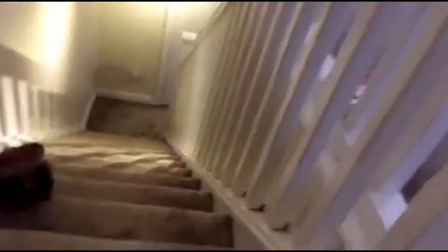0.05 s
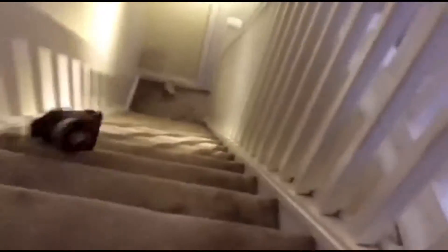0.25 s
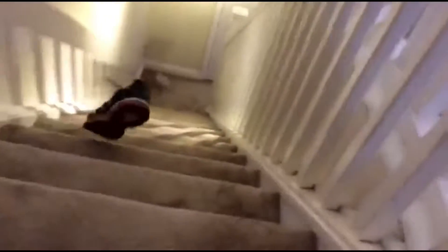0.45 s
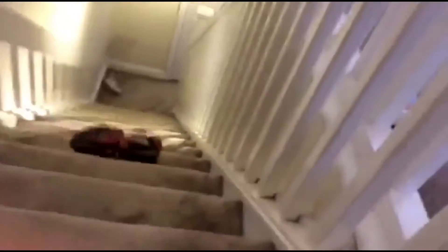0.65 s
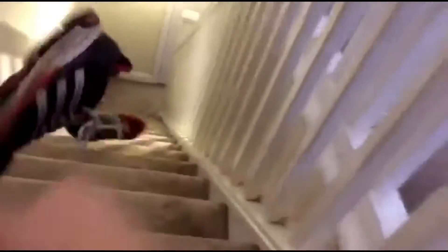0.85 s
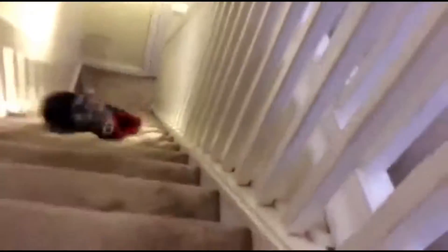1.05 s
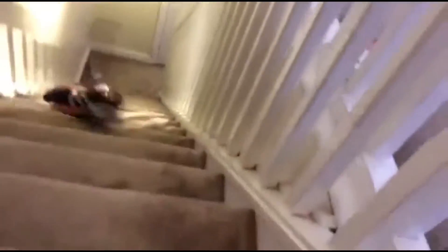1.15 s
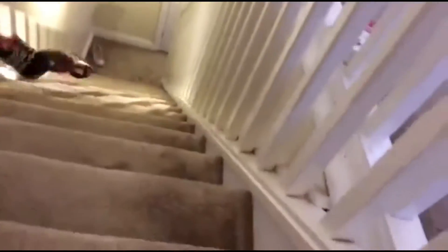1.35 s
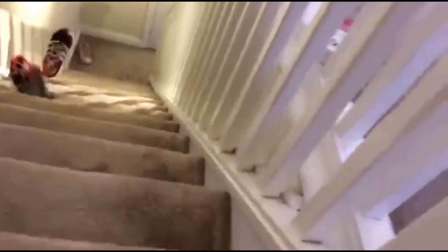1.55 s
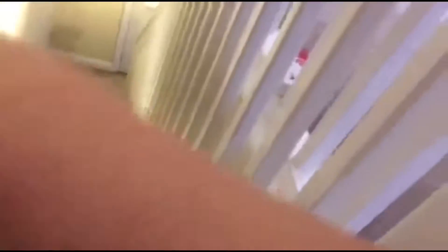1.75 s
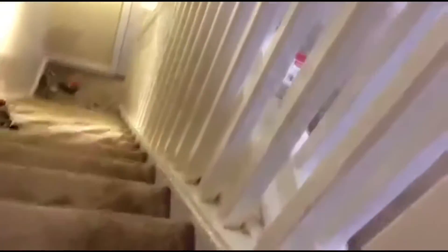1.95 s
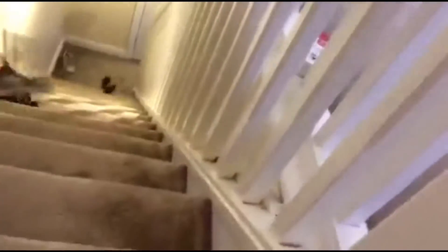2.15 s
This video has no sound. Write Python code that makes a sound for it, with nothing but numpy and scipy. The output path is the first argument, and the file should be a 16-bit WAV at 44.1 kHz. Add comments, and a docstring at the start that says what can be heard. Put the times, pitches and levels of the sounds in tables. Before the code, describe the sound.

Thrown shoes thud and bounce down a carpeted wooden staircase in two heavy tumbles.

```python
"""Shoes tumble down a carpeted wooden staircase. Over low room noise and a soft hiss, lace tips
tick, then a flurry of landings at 0.2 s rings the treads and the hollow flight under them, with
uppers scuffing the carpet, soles slapping and heels knocking. Lighter bounces and two rubber
squeaks follow; a second heavy tumble from 1.2 s brings a third squeak, and the last thuds fall
near 2 s. The stairwell gives every hit a short, boomy echo."""
import sys
import numpy as np
from scipy import signal
from scipy.fft import rfft, irfft
from scipy.io import wavfile
from scipy.ndimage import uniform_filter1d

SR = 44100
rng = np.random.default_rng(int(sys.argv[2]) if len(sys.argv) > 2 else 0)


def wrap_up_sound(samples):
    """Save the sound to the file named by the first command line argument, as 16-bit audio."""
    columns = np.atleast_2d(samples).T
    # keep every value between -1 and 1, then stretch to whole-number steps
    tamed = np.clip(columns, -1, 1)
    steps = np.round(tamed * 32767).astype(np.int16)
    wavfile.write(sys.argv[1], SR, steps)


N = 97020  # 2.2 s


def undb(db):
    """Decibels to gain."""
    return 10 ** (np.asarray(db) / 20)


def unit(x):
    """Scale to rms 1."""
    return x / np.sqrt(np.mean(x ** 2))


def fade(t, t60):
    """Exponential decay, 60 dB down after t60 seconds."""
    return np.exp(-np.log(1000) * t / max(t60, 1e-3))


def add(out, start_s, x):
    """Mix x in from start_s."""
    i = max(int(start_s * SR), 0)
    out[i:i + len(x)] += x[:len(out) - i]


def colour(x, points, tilt_db=0):
    """EQ x through (Hz, dB) points, tilted per octave and rolled off below the first; rms 1."""
    hz = np.fft.rfftfreq(len(x), 1 / SR) + 1
    point_hz, point_db = np.array(points).T
    db = np.interp(np.log2(hz), np.log2(point_hz), point_db)
    db += tilt_db * np.log2(np.maximum(hz, point_hz[0]))
    low_cut = np.minimum(hz / point_hz[0], 1) ** 2
    return unit(irfft(rfft(x) * undb(db) * low_cut, len(x)))


def resonate(x, hz, width_hz):
    """One band-pass resonance."""
    return signal.lfilter(*signal.iirpeak(hz, hz / width_hz, fs=SR), x)


def ring(t, hz, t60, push_s):
    """A mode that swells while the shoe presses on it, then dies away."""
    attack = np.sin(np.pi / 2 * np.minimum(t / push_s, 1)) ** 2
    return np.sin(2 * np.pi * hz * t) * fade(t, t60) * attack


# EQ curves of the low room noise and the hiss (frequency [Hz], relative level [dB])
ROOM_TONE_EQ = [(18, -28), (30, -3), (87, 3), (139, -6), (345, -8), (550, -46), (618, -30), (798, -25.5),
                (1300, -44.5), (1840, -49.5), (2550, -54), (3540, -35), (7800, -54), (10100, -98),
                (17200, -120)]
HISS_EQ = [(400, 5.5), (1000, -3), (1500, -1), (1690, 6), (1870, 7.5), (2030, -1.5), (2800, -8),
           (3400, -3.5), (4000, -10), (7800, -15.5)]
# Fader rides of the same two layers (time [s], level [dB])
ROOM_TONE_RIDE = [(0, -48), (.15, -47), (.7, -47.5), (1.06, -78), (1.878, -46.5), (2.2, -75)]
HISS_RIDE = [(0, -49), (.075, -49.5), (.105, -45.5), (.15, -51.5), (.4, -54.5), (.75, -51), (1.06, -59),
             (1.18, -53), (1.7, -53), (1.87, -61.5), (2.2, -55)]


def room_tone():
    """A bed of low room noise and soft hiss, each swelling and dipping."""
    out, t = np.zeros(N), np.arange(N) / SR
    for eq, ride in ((ROOM_TONE_EQ, ROOM_TONE_RIDE), (HISS_EQ, HISS_RIDE)):
        level_db = np.interp(t, *np.array(ride).T)
        out += undb(level_db) * colour(rng.standard_normal(N), eq)
    return out


# Lace and eyelet hits (time [s], click level [dB], rattle level [dB], rattle t60 [s],
# ring pitch [Hz], relative ring level [dB])
LACE_HITS = [(0.1624, -46.5, -31.5, .14, 6170, -27), (0.169, -27, -37, 0.069, 6130, -1),
             (0.177, -38, -32, .14, 2220, 9), (0.2006, -26, -26, 0.11, 3270, -1),
             (0.2027, -27.5, -28, .06, 2960, -7), (0.225, -14, -41, .06, 3180, 6),
             (0.245, -30, -45, .08, 3240, 4.5), (0.27, -31.5, -38, .09, 3130, 15),
             (0.6126, -33, -48.5, 0.07, 5600, 2.5), (0.627, -41.5, -51, .06, 3120, -5.5),
             (0.853, -27.5, -42.5, 0.053, 4200, -23), (0.862, -29.5, -52.5, 0.052, 2900, -9),
             (0.910, -50.5, -36.5, .15, 4440, -14), (0.991, -51, -47, 0.14, 3730, -19),
             (1.2505, -27, -37.5, 0.14, 4700, -5), (1.264, -45.5, -32.5, 0.1, 5530, -6.5),
             (1.3677, -42.5, -56, 0.083, 4580, -4), (1.4326, -30.5, -43, 0.22, 7000, -34),
             (1.4837, -26.5, -45.5, 0.083, 3670, 15), (1.754, -45, -38, 0.18, 4470, -1),
             (1.766, -43, -38.5, 0.17, 3360, 17)]
# Bright EQ of a tick (frequency [Hz], relative level [dB])
TICK_EQ = [(500, -21), (1200, -4.5), (2300, 1), (3500, 3), (5000, -4.5), (6800, -0.5), (7800, -8.5)]


def lace_ticks(click_t60_s=0.0082, ring_width_hz=510):
    """Hard lace tips and eyelets click, then rattle briefly."""
    out, t = np.zeros(N), np.arange(SR // 4) / SR
    for start_s, click_db, rattle_db, rattle_t60, hz, ring_db in LACE_HITS:
        noise = rng.standard_normal(len(t))
        ping = undb(ring_db) * unit(resonate(noise, hz, ring_width_hz))
        bright = unit(colour(noise, TICK_EQ) + ping)
        envelope = undb(click_db) * fade(t, click_t60_s) + undb(rattle_db) * fade(t, rattle_t60)
        add(out, start_s, bright * envelope)
    return out


# Landings (time [s], tread pitch [Hz], tread level [dB], tread t60 [s],
# boom pitch [Hz], boom level [dB], staircase level [dB])
LANDINGS = [(0.193, 183.6, -8, 0.18, 87.5, -6.5, -27), (0.225, 197.5, -3.5, 0.16, 77.2, -9, -34),
            (0.246, 165.5, 0.5, 0.12, 73, -24.5, -18.5), (0.281, 172.6, -4.5, 0.13, 95, -38, -18.5),
            (0.306, 172.6, -1.5, 0.098, 90, -13, -26), (0.412, 206.4, -21, 0.24, 62, -44, -33.5),
            (0.543, 159, -31, 0.064, 75.7, -21, -39), (0.72, 227.4, -33.5, 0.093, 99, -55, -44),
            (0.78, 200, -24.5, 0.076, 99, -48, -43), (0.797, 214.7, -9, 0.08, 107.8, -40.5, -36),
            (0.841, 146.7, -8.5, .16, 98.8, -11.5, -29), (0.9, 119.5, -12, 0.059, 88.6, -29, -48),
            (1.088, 189, -31, 0.22, 99, -31, -37.5), (1.145, 202, -43, 0.21, 68, -33, -49),
            (1.230, 192.3, -8.5, 0.59, 92.8, -8.5, -13), (1.290, 181.5, -16.5, .35, 85.5, -16.5, -30),
            (1.343, 197, -19.5, 0.19, 96.8, -25, -24), (1.432, 158.5, 0, .15, 91.7, -2.5, -23),
            (1.453, 179, -20.5, 0.3, 58.8, -8.5, -18.5), (1.486, 160.4, -12.5, .15, 101.8, -19, -33.5),
            (1.520, 193.8, -30, 0.27, 71.7, -23.5, -36), (1.562, 172, -35, 0.14, 57.3, -15, -42),
            (1.690, 181.6, -9, 0.16, 57.4, -28.5, -29), (1.933, 168.8, -9.5, 0.18, 86.4, -11, -32.5),
            (1.983, 122.2, -18, 0.23, 70.5, -8.5, -41), (2.030, 143.8, -27.5, 0.25, 70.45, -14, -47.5)]
# Body resonances of the staircase (pitch [Hz], relative level [dB], t60 [s])
STAIRCASE_MODES = [(59.38, -6.5, 0.91), (70.2, -12, 0.87), (85.15, -9.5, 0.71), (101.9, -2, .5),
                   (116.54, 3.5, 0.34), (143.6, -6.5, 0.68), (188.55, -2, .55), (211, -9, 0.58),
                   (244.6, -2, 0.36), (269.3, -8, 0.28), (323.2, -10, 0.18), (359.3, -8, .16),
                   (453, -16, .28), (518, -25, 0.073)]


def stair_thuds(tread_push_s=0.0073, boom_push_s=0.0053, boom_t60_s=0.24):
    """Each landing rings its tread, the hollow beneath and the whole staircase."""
    out, t = np.zeros(N), np.arange(SR) / SR
    staircase = sum((-1) ** k * undb(db) * ring(t, hz, t60, tread_push_s)  # alternating polarity
                    for k, (hz, db, t60) in enumerate(STAIRCASE_MODES))
    for start_s, tread_hz, tread_db, tread_t60, boom_hz, boom_db, staircase_db in LANDINGS:
        tread = undb(tread_db) * ring(t, tread_hz, tread_t60, tread_push_s)
        boom = undb(boom_db) * ring(t, boom_hz, boom_t60_s, boom_push_s)
        add(out, start_s, tread + boom + undb(staircase_db) * staircase)
    return out


# Scuffs over the carpet (peak time [s], level [dB], attack [s], t60 [s], tilt [dB/octave])
CARPET_SCUFFS = [(0.255, -23.5, 0.054, 0.34, 0.5), (0.315, -29.5, 0.036, 0.13, 0),
                 (0.429, -44, 0.023, 0.16, 9), (0.541, -39.5, .04, 0.22, 8.5),
                 (0.785, -40.5, 0.038, 0.6, 8.5), (0.850, -33.5, 0.036, 0.1, 3.5),
                 (1.105, -47.5, 0.013, 0.26, 3.5), (1.265, -37.5, .02, 0.32, 2),
                 (1.375, -44, 0.017, 0.47, 2.5), (1.445, -36.5, .015, 0.13, 3), (1.490, -31, 0.029, .13, 0),
                 (1.640, -45.5, 0.081, 0.16, 4.5), (1.776, -46, .018, 0.12, 2.5),
                 (1.800, -45.5, .02, 0.088, -2), (1.963, -46.5, 0.013, 0.5, 10.5)]
# Muffled EQ of the carpet (frequency [Hz], relative level [dB])
CARPET_EQ = [(150, -20.5), (350, 9.5), (900, 5), (1300, 0), (2000, -2), (3200, -12), (5000, -18.5),
             (7800, -29)]


def carpet_scuffs(grains_per_s=2600, spread_db=0.5):
    """Carpet fibres catch and let go in dense grains as a shoe rolls over them."""
    out, t = np.zeros(N), np.arange(SR // 2) / SR
    for peak_s, db, attack_s, t60, tilt_db in CARPET_SCUFFS:
        catches = rng.random(len(t)) < grains_per_s / SR
        polarity = rng.choice([-1, 1], len(t))
        grain_db = spread_db * np.minimum(rng.exponential(size=len(t)), 4)
        texture = colour(catches * polarity * undb(grain_db), CARPET_EQ, tilt_db)
        swell = np.minimum(t / attack_s, 1) * fade(np.maximum(t - attack_s, 0), t60)
        add(out, peak_s - attack_s, undb(db) * swell * texture)
    return out


# Sole slaps (time [s], level into the broad filter [dB], pitch [Hz], bandwidth [Hz], t60 [s])
SOLE_HITS = [(0.243, -27.5, 953, 500, 0.025), (0.260, -23.5, 740, 400, 0.033),
             (0.263, -20.5, 340, 130, 0.099), (0.425, -32, 430, 200, .1), (0.556, -30.5, 496.6, 465, 0.051),
             (0.576, -34, 440, 254, .06), (0.613, -35.5, 950, 243, 0.029), (0.629, -36, 633.5, 397, 0.062),
             (0.726, -46, 870, 494, 0.24), (0.786, -39, 1400, 423, 0.19), (0.803, -28.5, 333, 130, 0.13),
             (0.8265, -30, 900, 400, .04), (0.838, -32, 890, 450, 0.042), (0.994, -36.5, 750, 404, 0.13),
             (1.234, -25, 555, 350, 0.15), (1.248, -27.5, 418, 252, 0.27), (1.433, -23.5, 368, 130, 0.13),
             (1.453, -30.5, 960, 300, 0.07), (1.464, -26, 845, 298, 0.1), (1.478, -28.5, 946, 298, 0.081),
             (1.499, -34.5, 1200, 500, 0.071), (1.635, -35, 417, 200, 0.12), (1.694, -36.5, 399, 111, 0.27),
             (1.715, -36.5, 450, 250, 0.11), (1.762, -33, 984, 603, 0.035), (1.939, -43, 626, 398, 0.25),
             (1.976, -39.5, 1050, 300, 0.051)]


def sole_slaps(broad_width_per_pitch=1.27):
    """Rubber soles slap: short, hollow noise bursts shaped by the sole's broad response."""
    out, t = np.zeros(N), np.arange(SR // 3) / SR
    for start_s, db, hz, width_hz, t60 in SOLE_HITS:
        band = unit(resonate(rng.standard_normal(len(t)), hz, width_hz))
        burst = undb(db) * band * fade(t, t60)
        add(out, start_s, resonate(burst, hz, broad_width_per_pitch * hz))
    return out


# Heel knocks (time [s], level [dB], pitch [Hz], t60 [s])
HEEL_HITS = [(1.2306, -9, 437, 0.025), (1.232, -18.5, 1025, 0.015), (1.235, -19, 344, 0.038),
             (1.238, -29.5, 530.5, .14), (0.244, -17.5, 1005, .02), (0.259, -23.5, 332, 0.075),
             (0.5535, -33.5, 830, 0.0093), (0.613, -30, 954, 0.045), (0.8265, -30.5, 828, 0.034),
             (0.995, -40, 670, 0.069), (1.974, -42, 1080, 0.034)]


def heel_knocks(push_s=0.0012):
    """A firm heel strikes the edge of a step: a tight, pitched knock."""
    out, t = np.zeros(N), np.arange(SR // 4) / SR
    for start_s, db, hz, t60 in HEEL_HITS:
        add(out, start_s, undb(db) * ring(t, hz, t60, push_s))
    return out


# Rubber squeaks (time [s], level [dB], pitch [Hz], t60 [s])
RUBBER_SLIPS = [(0.551, -36, 1690, 0.092), (0.911, -28.5, 2346, 0.074), (1.474, -26, 974, 0.13)]


def rubber_squeaks(attack_s=0.0022, waver_share=0.026):
    """Rubber sticks and slips for a moment at a wavering pitch."""
    out, t = np.zeros(N), np.arange(SR // 4) / SR
    for start_s, db, hz, t60 in RUBBER_SLIPS:
        waver = unit(uniform_filter1d(rng.standard_normal(len(t)), size=100))
        phase = 2 * np.pi * np.cumsum(hz * (1 + waver_share * waver)) / SR
        envelope = np.minimum(t / attack_s, 1) * fade(t, t60)
        add(out, start_s, undb(db) * np.sin(phase) * envelope)
    return out


# Reverb bands of the stairwell (centre [Hz], level [dB], t60 [s])
REVERB_BANDS = [(70, -11, 0.48), (177, -12.5, 0.52), (437, -9, 0.65), (1210, -12, 0.28), (3020, -11.5, .5),
                (7040, -9.5, .45)]


def stairwell_echo(shoes, build_s=0.005):
    """Diffuse echo between close walls; the low mids hang on longest."""
    t = np.arange(SR) / SR
    octave = np.log2(np.fft.rfftfreq(SR, 1 / SR) + 1)
    centres = np.log2([row[0] for row in REVERB_BANDS])
    spectrum, impulse_response = rfft(rng.standard_normal(SR)), np.zeros(SR)
    for solo, (_, db, t60) in zip(np.eye(len(REVERB_BANDS)), REVERB_BANDS):
        band = irfft(spectrum * np.interp(octave, centres, solo), SR)  # neighbours crossfade
        tail = fade(t, t60) * np.minimum(t / build_s, 1)
        impulse_response += undb(db) * band * tail / np.sqrt(np.sum(tail ** 2))
    return signal.fftconvolve(shoes, impulse_response)[:N]


def scene():
    """Mono mix of the tumbling shoes, their echo and the room tone."""
    shoes = stair_thuds() + heel_knocks() + sole_slaps() + rubber_squeaks()
    shoes += carpet_scuffs() + lace_ticks()
    return (shoes + stairwell_echo(shoes) + room_tone())[None]


def record(dry, low_cut_hz=21, high_cut_hz=7750):
    """The microphone thins the deepest bass, rounds the loudest peaks and cuts the top."""
    low_cut = signal.butter(2, low_cut_hz, "high", fs=SR, output="sos")
    high_cut = signal.ellip(10, .2, 70, high_cut_hz, fs=SR, output="sos")
    rounded = np.tanh(signal.sosfilt(low_cut, dry))
    return signal.sosfilt(high_cut, rounded)


dry = scene()
out = record(dry)
wrap_up_sound(out)
```